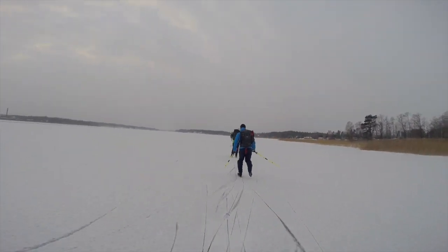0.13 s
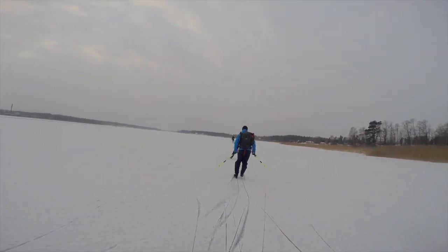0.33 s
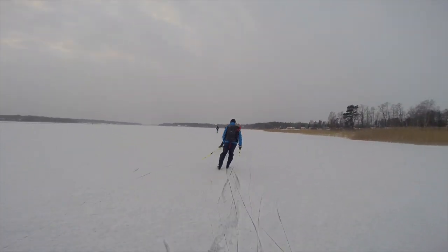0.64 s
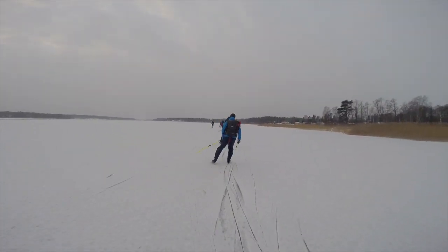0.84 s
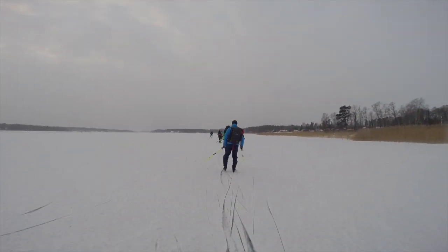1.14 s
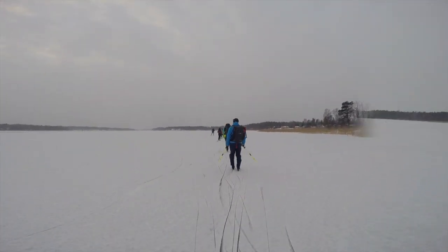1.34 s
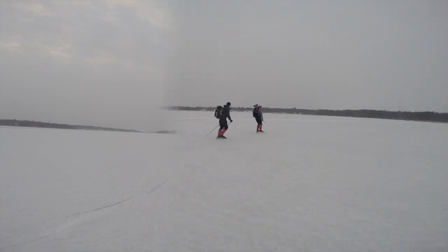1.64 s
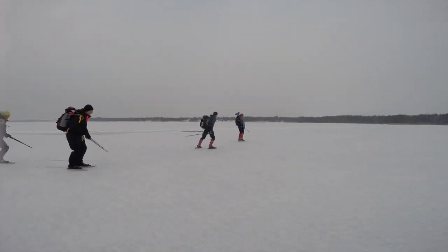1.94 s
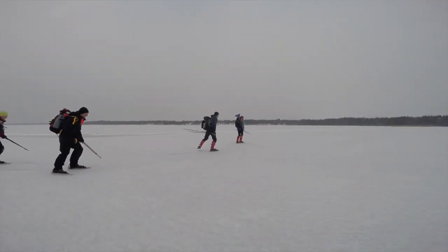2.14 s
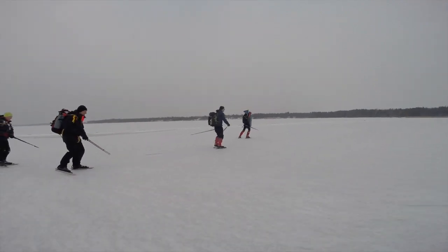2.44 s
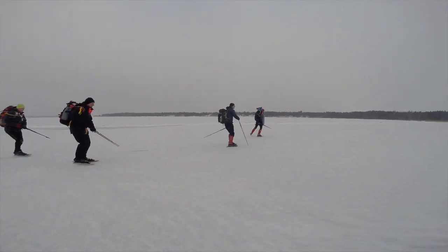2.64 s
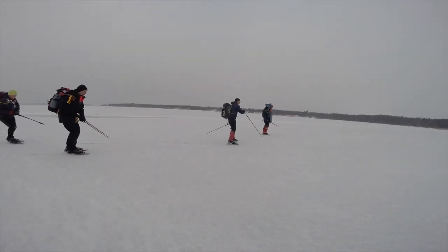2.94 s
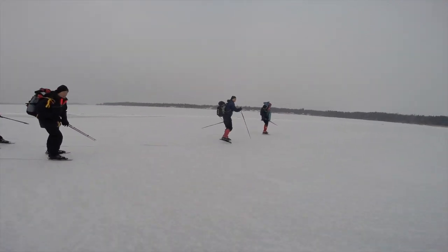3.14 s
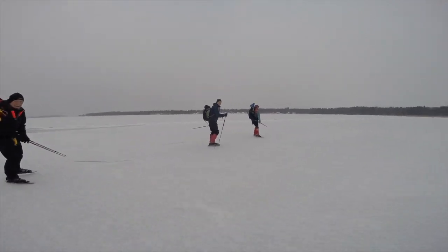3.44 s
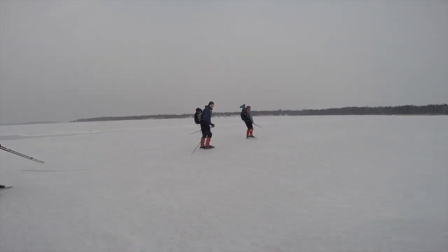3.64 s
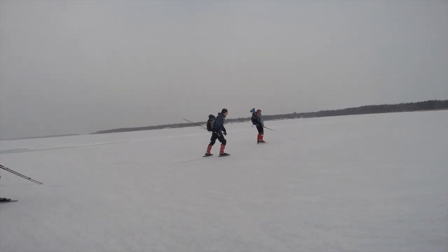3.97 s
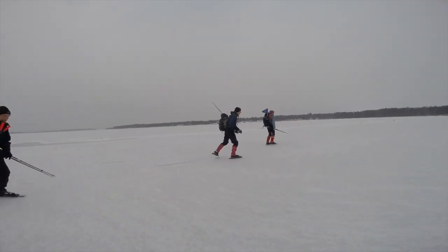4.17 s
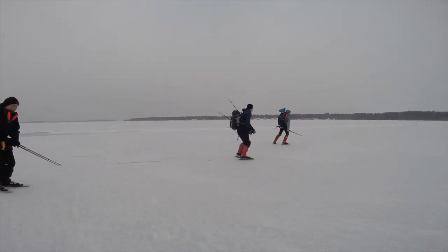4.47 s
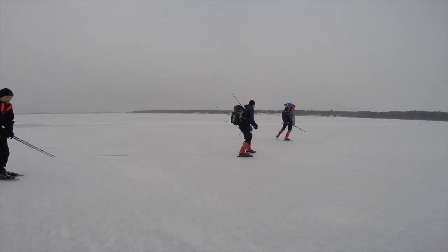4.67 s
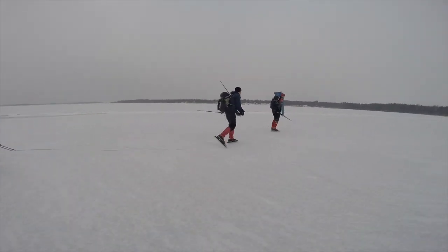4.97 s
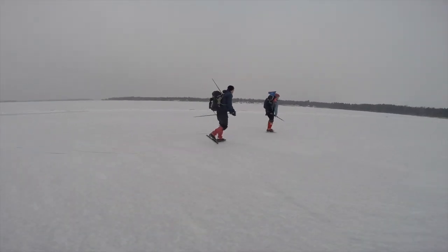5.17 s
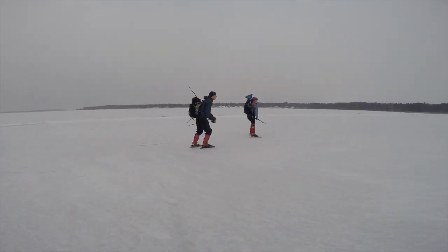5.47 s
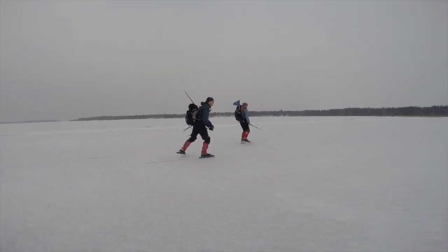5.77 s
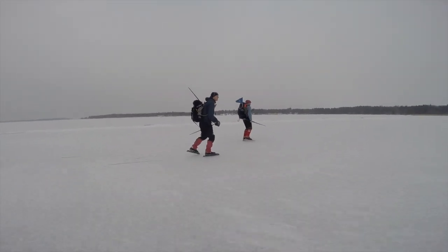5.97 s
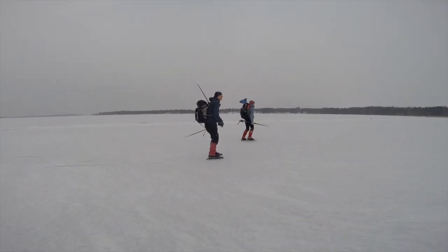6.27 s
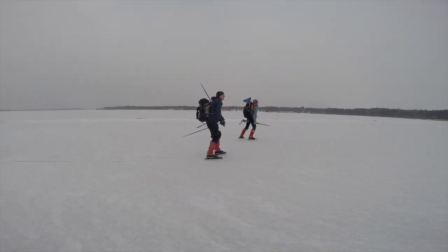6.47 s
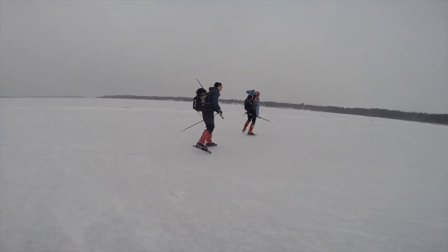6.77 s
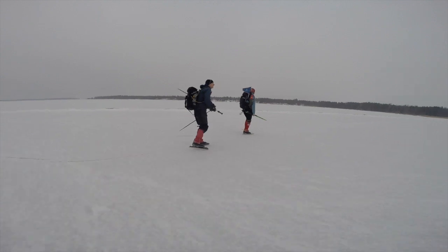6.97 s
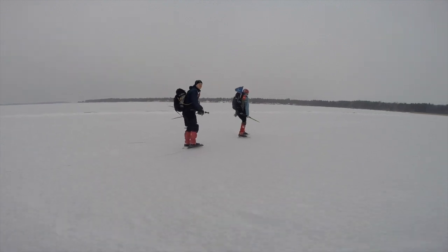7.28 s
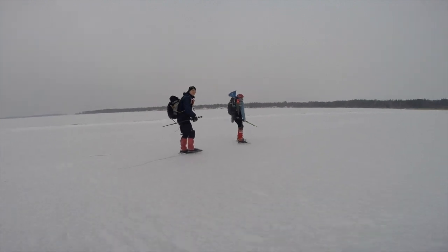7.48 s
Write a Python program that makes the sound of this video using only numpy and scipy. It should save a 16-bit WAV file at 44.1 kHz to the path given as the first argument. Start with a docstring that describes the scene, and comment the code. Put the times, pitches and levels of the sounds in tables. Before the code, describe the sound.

A microphone in a plastic case moves with skaters over bare ice. Early strokes are bright and crackling, followed by a flurry of knocks and ticks; later ones are darker, longer scrapes with steel chatter. Pole shafts ping very briefly. Gusts thud in the bass and a dull airflow swells through the second half, over faint hiss, dry and outdoors.

```python
"""Skaters on a frozen lake

Tour skaters cross the ice, heard from a camera in a plastic case that one of them carries.
Filtered noise makes the wind on the case; random grains of breaking ice make the scrape and spray of the skates.
Chips, pole tips and gear snap through the hollow resonances of the case, and the pole shafts ring.
Decaying sines ring a steel blade as it lands or chatters; loose snow swishes once, over faint hiss and whine."""
import sys
import numpy as np
from scipy import signal
from scipy.fft import rfft, irfft
from scipy.io import wavfile
from scipy.ndimage import uniform_filter1d

SR = 44100
rng = np.random.default_rng(int(sys.argv[2]) if len(sys.argv) > 2 else 0)


def store_pcm(level_fs):
    """Save levels as 16-bit WAV."""
    pcm = np.round(np.clip(level_fs, -1, 1) * 32767).astype(np.int16)
    wavfile.write(sys.argv[1], SR, np.atleast_2d(pcm).T)


N = 335601  # length [samples]

# spectrum of the buffeting, before its low-pass: (frequency [Hz], relative density [dB per Hz])
BUFFET_SPECTRUM = [(40, -12), (62, -1), (100, 1.5), (150, 0.5), (230, -4), (400, -13)]
# spectrum of the air rushing past the case: (frequency [Hz], relative density [dB per Hz])
RUSH_SPECTRUM = [(120, -28.5), (210, -3.5), (280, 0.5), (450, -4), (620, -9), (900, -13), (1100, -16),
                 (1400, -27.5), (1850, -31), (2500, -37), (5000, -68.5)]
# airflow over the case as the carrier speeds up and turns: (time [s], level of the rush before gusts [dB])
AIRFLOW = [(0.0, -46.5), (0.35, -35), (0.78, -42.5), (1.18, -36.5), (1.4, -38), (1.65, -35), (2.2, -30.5),
           (3.12, -26.5), (3.3, -36.5), (3.55, -33.5), (3.82, -26.5), (4.35, -21), (5.1, -23), (5.48, -30),
           (5.95, -24.5), (6.68, -22.5), (7.05, -33), (7.61, -28.5)]
# slow heave of the largest eddies between gusts: (time [s], level [dB])
HEAVE = [(0.0, -35), (0.35, -26), (0.8, -34.5), (1.08, -25.5), (1.7, -43), (2.15, -28.5), (3.1, -27.5),
         (4.0, -35), (4.65, -45), (5.8, -27), (6.4, -31), (7.05, -37), (7.61, -26)]
# gusts that thump the case: (middle [s], length [s], rise of the buffeting [dB])
GUSTS = [(0.2, 0.45, 9.5), (0.414, 0.16, 12), (0.548, 0.17, 9.5), (1.08, 0.3, 3.5), (1.83, 0.1, 5.5),
         (2.326, 0.29, 5), (2.756, 0.28, 6), (3.032, 0.13, 9), (3.174, .16, 9), (3.826, 0.49, 7),
         (4.2, 0.65, 3), (4.845, 0.14, 4.5), (5.217, 0.34, 5), (5.616, 0.092, 9.5), (5.9, 0.38, 4),
         (6.131, 0.11, 5), (6.81, 0.15, 7.5), (7.258, 0.39, 7), (7.556, 0.077, 9.5)]
CRUISE_DB = -23  # airflow at cruising speed
BUFFET_DB, BUFFET_SLOPE = -21, 0.71  # level at cruising airflow, and dB gained per dB of airflow
GUST_HEAVE_SHARE, GUST_RUSH_SHARE = 0.48, 0.35  # part of each gust's dB rise that reaches heave and rush
# quick and slow flutter [dB] in weak airflow, and the share left at cruising speed
FLUTTER_DB, SWAY_DB, CRUISE_FLUTTER_SHARE = 1.5, 1.1, 0.65

# spectrum of ice crushed under the edge: (frequency [Hz], relative density [dB per Hz])
SCRAPE_SPECTRUM = [(250, -30), (600, -1.5), (900, 0.5), (1100, 0), (1400, -9), (1650, -0.5), (1850, 3.5),
                   (2150, -4), (2530, -12), (2900, -10.5), (3300, -7), (3750, -35), (4150, -15),
                   (4550, -49), (4950, -24), (5500, -41)]
# spray from the skates ahead: (frequency [Hz], relative density [dB per Hz])
SPRAY_AHEAD = [(2500, 1), (3500, 3), (4250, -9.5), (5000, -1.5), (5450, -8), (5900, -4.5), (6850, -9.5),
               (7150, -7), (8000, -14), (8350, -8), (9500, -20), (10200, -17), (10850, -28), (11800, -19),
               (12900, -27), (14450, -25), (15000, -38)]
# spray from the skates alongside: (frequency [Hz], relative density [dB per Hz])
SPRAY_BESIDE = [(2500, 0.5), (3700, 5), (4200, 7), (4600, -1), (5000, 6), (5550, -4), (6400, 5.5),
                (7100, -6), (7450, -2), (7800, -2), (8400, -1.5), (9200, -13), (10400, -7.5), (11700, -5),
                (12800, -12), (13800, -24), (15000, -28)]
# skate strokes, about one a second, some in several pushes:
# (edge fully dug in [s], length [s], scrape level [dB], spray level [dB], fade [dB/s], digging in [s])
STROKES = [(0.295, 0.13, -28.5, -35, 70, 0.055), (0.46, 0.091, -33.5, -38, 22, 0.067),
           (1.029, 0.2, -23, -33.5, 43, 0.017), (1.208, 0.07, -31, -28.5, 7, 0.034),
           (1.318, 0.093, -35, -34, -11, 0.026), (1.803, 0.16, -33, -54, 34, 0.099),
           (2.016, 0.26, -29, -49, 27, .014), (2.842, 0.2, -30, -48, 60, .04),
           (3.043, 0.17, -29.5, -47, 9, 0.075), (3.686, 0.54, -26.5, -42.5, 27, 0.075),
           (4.75, 0.14, -28, -53, 60, 0.015), (5.76, 0.064, -25, -41, 10, .04),
           (5.876, 0.15, -21.5, -39, 45, 0.049), (6.6, 0.29, -30.5, -50, 39, 0.046),
           (7.473, 0.13, -25, -54, 37, 0.029)]
# blades coasting between strokes: (time [s], scrape level [dB], spray level [dB])
COASTING = [(0.0, -43, -49), (0.95, -44.5, -45), (1.6, -38.5, -55), (2.6, -40, -59), (3.45, -41.5, -62),
            (4.2, -36.5, -51), (5.15, -38, -53.5), (5.45, -39, -58), (6.4, -42.5, -57.5),
            (7.15, -45.5, -76), (7.61, -40, -57)]
EDGE_TRIM_DB = -2.0  # applied to all scrape and spray levels in the mix
LIFT_S = 0.015  # time for the edge to leave the ice
TURN_S = 1.45  # the view has swung from ahead to the side

# chips breaking off the ice: their level is CHIP_DB + CHIP_SLOPE x level of the scrape, plus a random spread
CHIPS_PER_S, CHIP_DB, CHIP_SLOPE, CHIP_SPREAD_DB = 68, -18.5, 0.6, 6.5

# the case's answer to a tap: (frequency [Hz], gain [dB])
CASE_RESPONSE = [(120, -2.5), (450, -5), (860, 3.5), (1050, 2), (1380, -8.5), (1860, -3.5), (2200, -10),
                 (2600, -18), (3330, -6), (4050, -23), (4900, -24.5), (8000, -31.5), (11800, -35),
                 (15000, -61)]
# clicks of pole tips and gear:
# (time [s], clack pitch [Hz], clack level [dB], knock re clack [dB], tick re clack [dB])
CLICKS = [(0.132, 1490, -39.5, 8, -19), (0.189, 1740, -35.5, 1.5, -19), (0.3, 1590, -25.5, 6.5, -29),
          (0.531, 2200, -18, -6, -18), (0.723, 1690, -29, 6, -30), (0.793, 1440, -38, 11, -28),
          (0.818, 2350, -34.5, -4, -11), (0.853, 1730, -34, -7, -3.5), (1.043, 1880, -26.5, -7, -11),
          (1.058, 1910, -27.5, -2, -24), (1.168, 1900, -35.5, 11.5, -15), (1.192, 2000, -26, -6, -24),
          (1.198, 1800, -21.5, 0, -26), (1.21, 1830, -23, 2, -16), (1.2378, 1750, -15.5, 4.5, -23),
          (1.2582, 1880, -20.5, -4, -16), (1.266, 2820, -24, 4, -6), (1.277, 1920, -31.5, 17, -14),
          (1.314, 1900, -36, 0, -9), (1.336, 1680, -35, 6, -17), (1.375, 2000, -27.5, 6, -18),
          (1.4105, 2240, -21, 9, -15), (1.529, 1820, -28.5, -7, -35), (1.575, 2150, -32, 1, -18),
          (1.595, 2190, -36, 2, -19), (1.823, 1850, -27.5, 2.5, -28), (1.872, 2330, -24.5, 3, -15),
          (1.897, 1760, -21.5, -1, -17), (1.971, 2630, -36, 9.5, -10), (2.02, 1860, -25, 4.5, -22),
          (2.061, 1790, -20.5, -8, -20), (2.088, 1780, -26, -2, -21), (2.157, 1950, -21.5, 0, -21),
          (2.198, 1900, -32, 3, -11), (2.24, 2130, -26, -2, -18), (2.27, 1810, -23, -2, -17),
          (2.326, 2550, -32.5, -9, -8.5), (2.344, 2050, -29, -2, -22), (2.371, 1820, -31.5, 3, -16),
          (2.397, 1820, -24.5, 4.5, -16), (2.461, 1820, -33.5, 2, -12), (2.551, 1980, -29.5, 5.5, -9.5),
          (2.763, 1730, -29, 7.5, -10), (2.812, 2040, -29, -1, -10.5), (3.049, 2290, -32.5, 7, -10.5),
          (3.103, 2450, -25.5, -8, -13), (3.117, 1720, -30, -9, -16), (3.184, 1740, -26.5, -2, -18),
          (3.231, 1900, -21.5, 2.5, -22), (3.276, 1860, -20.5, -2.5, -25), (3.32, 1930, -35, 0, -25),
          (3.354, 2040, -31, 0, -18), (3.587, 1930, -35.5, 8.5, -12), (3.648, 2600, -35, -1, -10),
          (3.678, 1850, -31, -6, -6.5), (3.724, 1820, -23, -11, -20), (3.771, 1980, -29, -11, -24),
          (3.831, 2000, -32, -3, -9), (3.912, 2000, -19.5, -1, -16), (3.963, 1670, -33, -2, -13),
          (4.025, 2010, -31, 0, -15), (4.076, 1900, -31, 7.5, -9.5), (4.111, 1800, -31, -3, -13),
          (4.261, 1520, -21.5, -3, -19), (4.369, 1840, -31.5, 0, -12), (4.399, 1640, -30.5, 0, -14),
          (4.455, 1640, -25, 4, -23), (4.478, 1870, -28, 6, -16), (4.858, 1900, -31, 4, -28),
          (5.002, 1815, -36, 5, -10), (5.051, 1870, -32, -12, -22), (5.161, 1550, -32, 6, -17),
          (5.367, 1950, -24, -2, -25), (5.453, 1745, -31.5, 4.5, -29), (5.613, 1800, -34, -4, -26),
          (5.807, 2320, -21, -16, -17), (5.843, 1770, -28, -2, -8.5), (5.91, 2020, -25.5, 2.5, -13),
          (6.02, 1900, -28.5, 4, -23), (6.06, 2600, -25.5, -12, -9), (6.235, 1760, -26.5, 2, -23),
          (6.383, 1750, -22, -2, -21), (6.524, 2210, -24.5, 3, -11), (6.575, 2085, -32, 3, -18),
          (6.615, 1740, -25.5, 1, -21), (6.767, 1750, -20.5, -8, -26), (6.834, 1740, -22, -5, -26),
          (6.886, 2000, -21.5, 1, -21), (6.938, 1900, -23.5, 2.5, -17), (6.993, 2040, -28.5, -2, -14.5),
          (7.073, 1790, -30.5, -3, -27), (7.141, 1900, -35, 1, -12), (7.242, 1770, -34.5, 7, -27),
          (7.367, 2120, -28.5, 1, -20), (7.404, 2380, -31.5, 0, -25), (7.556, 1810, -22, -2.5, -20),
          (7.567, 1810, -22, -15, -27)]
# snap inside each crunch: delay [s], mean level re crunch and its spread [dB]
SNAP_S, SNAP_DB, SNAP_SPREAD_DB = 0.0016, -4, 3

# a pole shaft rings after its tip lands, sliding as it is loaded:
# (time [s], starting pitch [Hz], starting level [dB], 60 dB decay [s], glide [Hz/s])
POLES = [(0.854, 735, -21.5, 0.069, -1200), (0.853, 1650, -28, 0.025, 12000),
         (2.327, 2600, -22.5, 0.033, 9000), (2.345, 2050, -18.5, 0.032, 6000),
         (6.059, 2680, -15.5, 0.024, -12000), (6.058, 9900, -27, 0.012, 0),
         (6.575, 2180, -15, 0.039, -14000)]

# ring of the free blade, before load shifts it: (frequency [Hz], relative level [dB], 60 dB decay [s])
BLADE_MODES = [(1775, 9, 0.05), (1830, 3, 0.048), (2635, -4.5, 0.028), (2950, -12, 0.04),
               (3260, -3.5, 0.018), (4200, -14, 0.018), (4960, -17, 0.031)]
# a blade is set down hard: (time [s], level of the first touch [dB], gap to its first bounce [s])
LANDINGS = [(2.006, -22, .014), (4.704, -17, 0.019), (5.709, -15, .017), (7.464, -21, 0.0078)]
BOUNCE_RATIO, BOUNCE_LOSS_DB = 0.82, 2.2  # each bounce comes sooner and weaker than the last

# the edge chatters as it bites: (start [s], end [s], first pitch [Hz], last pitch [Hz], level [dB])
CHATTERS = [(2.036, 2.145, 1840, 1830, -29.5), (3.675, 3.834, 1750, 1950, -34),
            (4.762, 4.84, 1786, 1800, -30), (5.755, 5.798, 1780, 1950, -26.5),
            (5.82, 6.02, 2000, 1800, -33), (6.575, 6.697, 2030, 1780, -36.5),
            (7.495, 7.566, 1779, 1770, -25.5)]
CHATTER_MIN_GAP_S, CHATTER_MAX_GAP_S = 0.006, 0.017  # time between slips
CHATTER_SPREAD_DB, CHATTER_DAMPING = 2.5, 1.5  # scatter of the slips; a loaded blade rings shorter

# airy bands of the loose snow: (centre [Hz], width [Hz])
SWISH_BANDS = [(5750, 600), (8800, 1100)]
SWISH_S, SWISH_LENGTH_S, SWISH_DB = 4.18, 0.1, -49  # middle, whole length, level at the middle

WHINE_HZ, WHINE_DB, HISS_DB = 14625, -86, -64.5
TOP_HZ = 14800  # where the camera cuts the treble


def undb(db):
    """Decibels to gain."""
    return 10 ** (np.asarray(db) / 20)


def unit(x):
    """Scale to rms 1."""
    return x / np.sqrt(np.mean(x ** 2) + 1e-18)


def curves(table):
    """The columns of a table, joined by straight lines in time."""
    s, *columns = np.transpose(table)
    return [np.interp(np.arange(N) / SR, s, column) for column in columns]


def colour(x, points, size=8192):
    """Causal minimum-phase filter with the given (frequency [Hz], gain [dB]) response."""
    hz, db = np.transpose(points)
    f = np.maximum(np.arange(size // 2 + 1) * SR / size, 1)
    gain = undb(np.interp(np.log(f), np.log(hz), db))
    # folding the cepstrum onto positive times gives minimum phase
    cepstrum = irfft(np.log(gain))
    cepstrum[1:size // 2] *= 2
    cepstrum[size // 2 + 1:] = 0
    impulse = irfft(np.exp(rfft(cepstrum)))
    return signal.fftconvolve(x, impulse)[:len(x)]


def band(x, hz, kind, order=3):
    """Butterworth filter along the last axis."""
    return signal.sosfilt(signal.butter(order, hz, kind, fs=SR, output="sos"), x)


def walk(rate):
    """Smooth random drift of rms 1 with a new target rate times a second."""
    k = max(int(SR / rate), 1)
    steps = np.repeat(rng.standard_normal(N // k + 1), k)
    return unit(uniform_filter1d(steps, k)[:N])


def grains(rate, spread_db):
    """Random snaps, rate a second on average: many small, a few large."""
    size = undb(spread_db * np.minimum(rng.exponential(size=N), 4))
    happens = rng.random(N) < rate / SR
    return unit(happens * size * rng.choice([-1, 1], N))


def add(out, s, sound):
    """Mix a sound in at time s."""
    i = max(int(s * SR), 0)
    out[i:i + len(sound)] += sound[:max(N - i, 0)]


def steady(x, size=4096):
    """Even out the slow chance swells of a noise, to rms 1."""
    return x / np.sqrt(uniform_filter1d(x ** 2, size) + 1e-18)


def gusts():
    """Each gust swells and dies away smoothly; their joint rise in dB."""
    t = np.arange(N) / SR
    return sum(db * np.cos(np.pi * np.clip((t - s) / length, -0.5, 0.5)) ** 2 for s, length, db in GUSTS)


def wind():
    """Large eddies heave and thump against the case; small ones rush past it, steadier as the airflow grows."""
    flow_db, gust_db = curves(AIRFLOW)[0], gusts()
    heave_db = curves(HEAVE)[0] + GUST_HEAVE_SHARE * gust_db
    buffet_db = BUFFET_DB + BUFFET_SLOPE * (flow_db - CRUISE_DB) + gust_db
    rush_db = flow_db + GUST_RUSH_SHARE * gust_db
    unrest = np.clip((CRUISE_DB - flow_db) / 10, CRUISE_FLUTTER_SHARE, 1)
    flutter = undb(unrest * (FLUTTER_DB * walk(45) + SWAY_DB * walk(12)))
    heave = unit(band(rng.standard_normal(N), [18, 66], "bandpass"))
    buffet = unit(band(colour(rng.standard_normal(N), BUFFET_SPECTRUM), 225.0, "lowpass"))
    rush = steady(colour(rng.standard_normal(N), RUSH_SPECTRUM))
    return heave * undb(heave_db) + flutter * (buffet * undb(buffet_db) + rush * undb(rush_db))


def hiss():
    """The camera's faint hiss: noise with its treble rolled off."""
    return undb(HISS_DB) * unit(band(rng.standard_normal(N), 8900, "lowpass"))


def whine():
    """The camera's faint whine: one steady, very high sine."""
    return undb(WHINE_DB) * unit(np.sin(2 * np.pi * WHINE_HZ * np.arange(N) / SR))


def edge_levels():
    """Scrape and spray in dB: strokes bite, fade or swell, and lift, adding power to the coasting blades."""
    t = np.arange(N) / SR
    power = undb(curves(COASTING)) ** 2
    for start, length, scrape_db, spray_db, fade_db_per_s, bite_s in STROKES:
        age = t - start
        dig_in = np.clip(1 + age / bite_s, 0, 1)
        lift = np.clip(1 - (age - length) / LIFT_S, 0, 1)
        push = dig_in * lift * undb(-fade_db_per_s * np.clip(age, 0, length))
        power = power + np.outer(undb([scrape_db, spray_db]), push) ** 2
    return 10 * np.log10(power)


def patchy(x, spread_db, size=256):
    """Let narrow bands flare for a few ms each, as single shards ring at their own pitch."""
    frames = signal.stft(x, nperseg=size)[2]
    flare = rng.standard_normal(frames.shape)
    for axis in (0, 1):
        flare = uniform_filter1d(flare, size=3, axis=axis)
    flared = frames * undb(spread_db * unit(flare))
    return unit(signal.istft(flared, nperseg=size)[1][:len(x)])


def skates():
    """The edge crushes ice in uneven spurts of grains and throws off a fine spray."""
    scrape_db, spray_db = edge_levels()
    ahead = np.clip((TURN_S - np.arange(N) / SR) / 0.03, 0, 1)  # the swing to the side takes 30 ms
    bite = unit(walk(70) + 0.61 * walk(28))  # bumps in the ice shake scrape and spray alike
    crush = grains(rate=900, spread_db=3.0) * undb(3.56 * bite + 3.1 * walk(300))
    fine = unit(grains(rate=4000, spread_db=1.0) * undb(1.5 * bite + 2.0 * walk(160)))
    dust = fine + undb(-5) * unit(crush)  # each grain that breaks also crackles in the spray
    # the nearest blades, straight ahead, also growl through the ice sheet
    growl = unit(band(crush, [780, 1080], "bandpass", order=2)) * ahead * undb(-12.0)
    scrape = unit(colour(crush, SCRAPE_SPECTRUM)) + growl
    spray = ahead * unit(colour(dust, SPRAY_AHEAD)) + (1 - ahead) * unit(colour(dust, SPRAY_BESIDE))
    spray = patchy(spray, spread_db=4.0)
    return scrape * undb(scrape_db + EDGE_TRIM_DB) + spray * undb(spray_db + EDGE_TRIM_DB)


def chips():
    """Chips of ice crack off under the blades, louder when an edge digs in, from hollow clack to high tick."""
    out, t = np.zeros(N), np.arange(SR // 60) / SR
    scrape_db, _ = edge_levels()
    crack = t * np.exp(-t / 0.00094)
    for when, size, thinness, force in rng.random((int(CHIPS_PER_S * N / SR), 4)):
        snap = rng.standard_normal(len(t)) * crack
        clack = unit(colour(snap, CASE_RESPONSE, size=512)) * undb(-18 * thinness)
        tick = unit(colour(snap, SPRAY_BESIDE, size=512)) * undb(-21.5)
        db = CHIP_DB + CHIP_SLOPE * scrape_db[int(when * N)] + CHIP_SPREAD_DB * (size + force - 1)
        add(out, when * N / SR, (clack + tick) * undb(db))
    return out


def clicks():
    """Each contact is a crunch of a few ms with a snap in it: a pitched clack, a low knock and a gritty tick."""
    out, t = np.zeros(N), np.arange(SR // 20) / SR
    contact = (1 - np.exp(-t / 0.0007)) ** 2 * (np.exp(-t / 0.0017) + 0.03 * np.exp(-t / 0.005))
    noises = rng.standard_normal((len(CLICKS), len(t)))
    crunches = np.array([colour(unit(noise * contact), CASE_RESPONSE, size=1024) for noise in noises])
    snap_db = SNAP_DB + SNAP_SPREAD_DB * rng.standard_normal((len(CLICKS), 1))
    snap = colour(unit(signal.unit_impulse(len(t), int(SNAP_S * SR))), CASE_RESPONSE, size=1024)
    taps = crunches + undb(snap_db) * snap
    knocks = band(taps, 1124, "lowpass", order=5)
    clacks = band(taps, [1300, 3500], "bandpass")
    ticks = band(crunches, 3980, "highpass", order=6)
    for (s, hz, db, knock_db, tick_db), knock, clack, tick in zip(CLICKS, knocks, clacks, ticks):
        clack = band(clack, [hz / 1.14, hz * 1.232], "bandpass", order=1)
        tap = unit(clack) + undb(knock_db) * unit(knock) + undb(tick_db) * unit(tick)
        # levels hold for the first fifth of the tap, where its energy lies; contact starts 0.4 ms early
        add(out, s - 0.0004, undb(db) * tap / np.sqrt(5))
    return out


def poles():
    """A struck pole rings briefly on a mode or two, most of which slide in pitch."""
    out, t = np.zeros(N), np.arange(SR // 8) / SR
    for s, hz, db, t60, glide in POLES:
        add(out, s, undb(db - 60 * t / t60) * np.sin(2 * np.pi * (hz + glide * t / 2) * t))
    return out


def strike(pitch, damping, crack_db):
    """One touch of steel on ice: a crack, and the blade's modes, a little different each time with the load."""
    t = np.arange(SR // 14) / SR
    ring = np.zeros(len(t))
    for hz, db, t60 in BLADE_MODES:
        load, share = rng.standard_normal(2)
        decay = undb(db + 3.3 * share - 60 * damping * t / t60)
        mode_hz = hz * pitch * (1 + 0.007 * load)
        ring += decay * np.sin(2 * np.pi * mode_hz * t + np.pi * load)
    steel = ring * (1 - np.exp(-t / 0.0006)) * (1 + np.exp(-t / 0.005))  # soft onset, stronger start
    contact = t * np.exp(-t / 0.0009)
    crack = colour(rng.standard_normal(len(t)) * contact, CASE_RESPONSE, size=512)
    crack = band(crack, 1700, "highpass", order=1)
    return steel / np.abs(steel).max() * undb(6.5) + crack / np.abs(crack).max() * undb(crack_db)


def blade():
    """The blade lands flat and rings, then bounces on its edge, ever faster, with more crack to the ring."""
    out = np.zeros(N)
    for s, db, gap in LANDINGS:
        for bounce in range(4):  # the landing and three bounces
            if bounce:
                touch = strike(1, 1.3, crack_db=1.5)
            else:
                touch = strike(0.97, 1.15, crack_db=-3.5)
            add(out, s, touch * undb(db - BOUNCE_LOSS_DB * bounce))
            s += gap * BOUNCE_RATIO ** bounce
    return out


def chatter():
    """Stick and slip strike the blade again and again, unevenly: a pitched rasp that slides with the load."""
    out = np.zeros(N)
    for start, end, first_hz, last_hz, db in CHATTERS:
        rasp, s = np.zeros(N), start
        length = max(end - start, 0.01)
        while s < start + length:
            hz = first_hz + (last_hz - first_hz) * (s - start) / length
            slip = strike(hz / BLADE_MODES[0][0], CHATTER_DAMPING, crack_db=-3.5)
            add(rasp, s, slip * undb(CHATTER_SPREAD_DB * rng.uniform(-0.56, 1)))
            s += rng.uniform(CHATTER_MIN_GAP_S, CHATTER_MAX_GAP_S)
        # the level holds over the length of the chatter
        out += unit(rasp) * np.sqrt(length * SR / N) * undb(db)
    return out


def swish():
    """Loose snow sprays off a blade at the end of the long push: a brief puff of noise in airy bands."""
    air = np.zeros(N)
    for hz, width in SWISH_BANDS:
        edges = [hz - width / 2, hz + width / 2]
        air += unit(band(rng.standard_normal(N), edges, "bandpass", order=2))
    age = np.arange(N) / SR - SWISH_S
    swell = np.cos(np.pi * np.clip(age / SWISH_LENGTH_S, -0.5, 0.5))
    return unit(air) * swell * undb(SWISH_DB)


def scene():
    """Wind, skates and clicks in the open, with no echo, over the camera's faint hiss and whine."""
    air = wind() + hiss() + whine()
    ice = skates() + chips() + swish()
    contacts = clicks() + poles() + blade() + chatter()
    return (air + ice + contacts)[None]


def record(dry):
    """The camera rounds the loudest peaks and cuts the top."""
    rounded = dry / (1 + (dry / 0.9) ** 6) ** (1 / 6)
    return signal.sosfilt(signal.ellip(8, 0.2, 70, TOP_HZ, fs=SR, output="sos"), rounded)


dry = scene()
out = record(dry)
store_pcm(out)
```